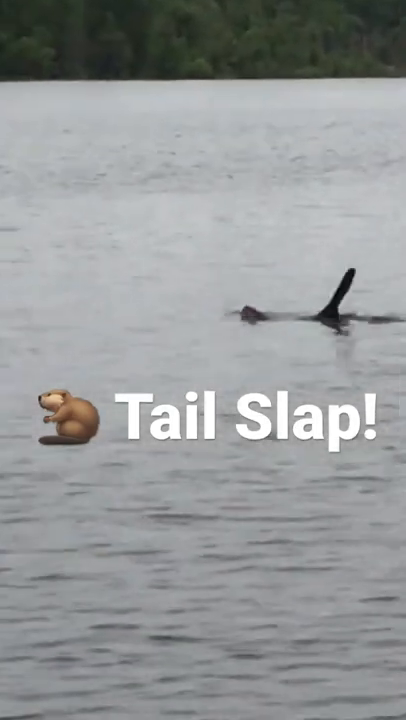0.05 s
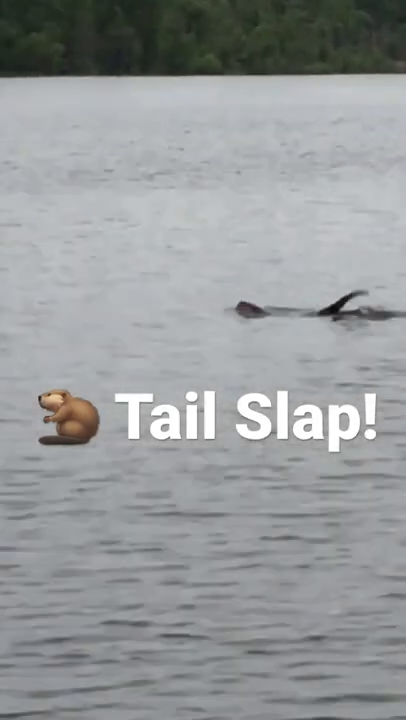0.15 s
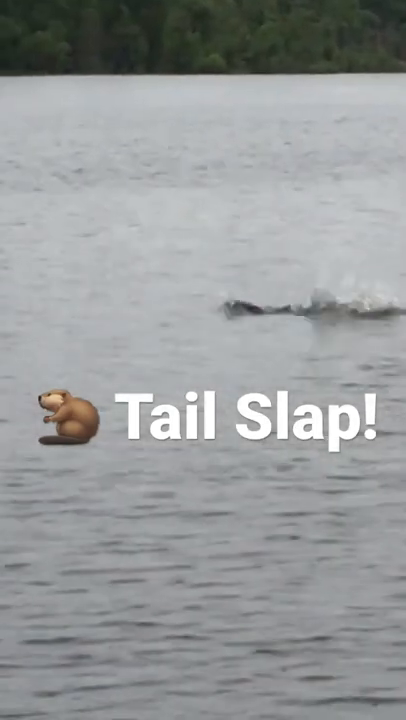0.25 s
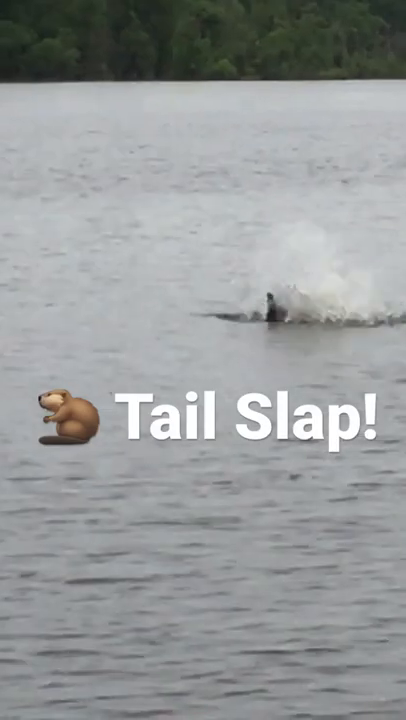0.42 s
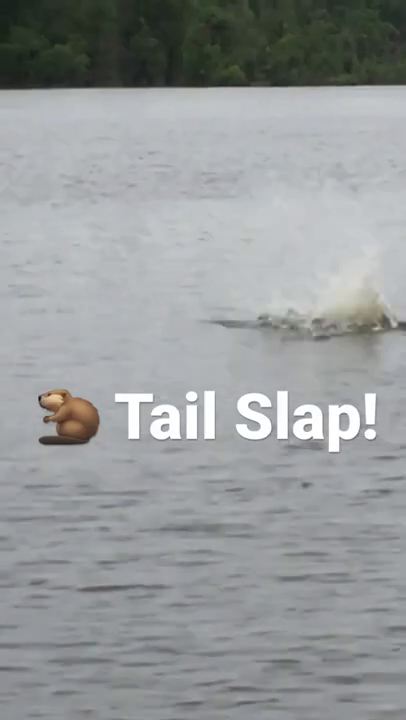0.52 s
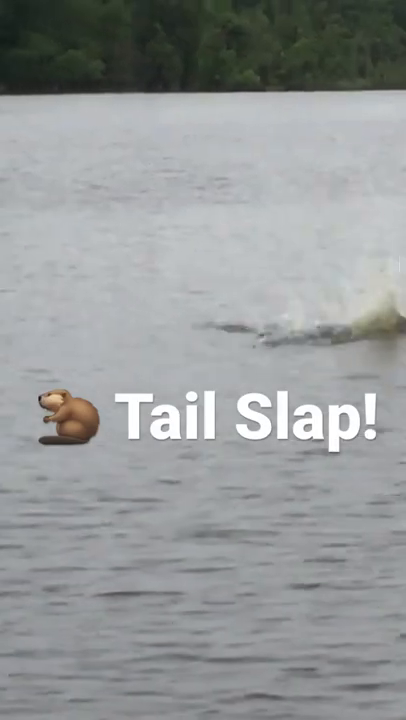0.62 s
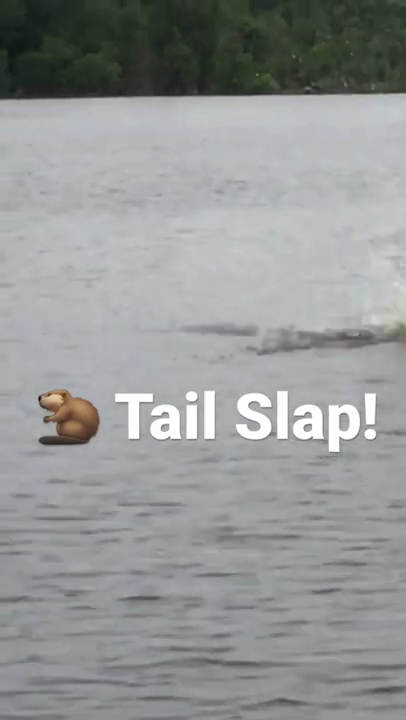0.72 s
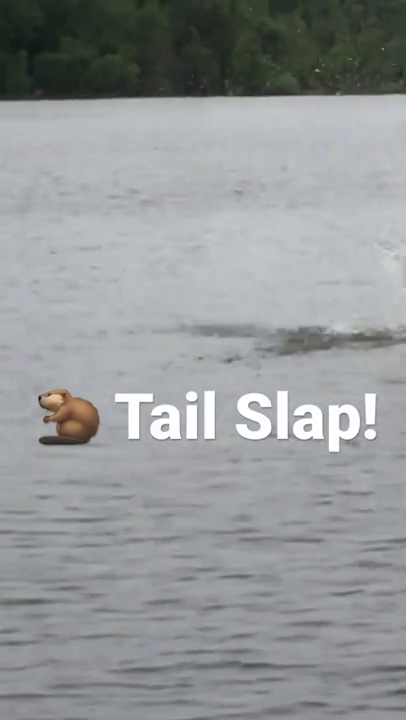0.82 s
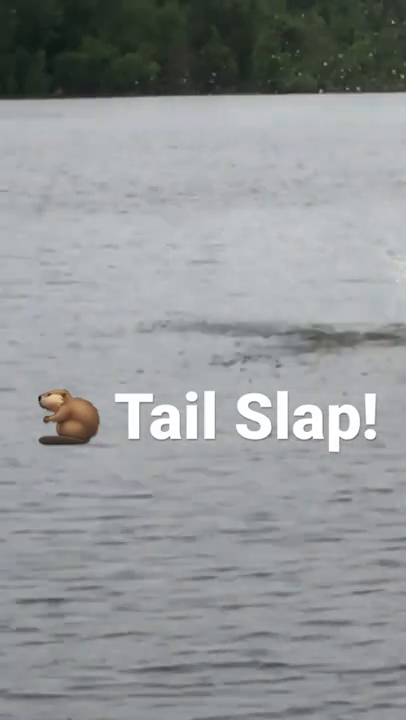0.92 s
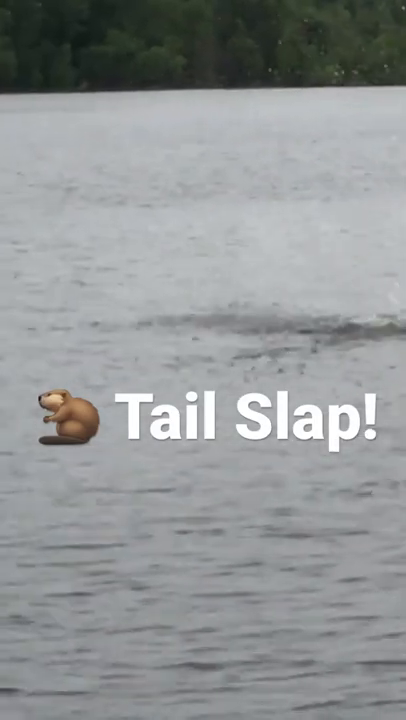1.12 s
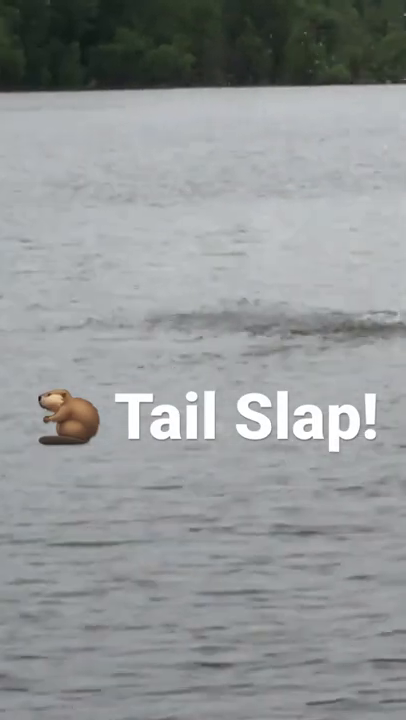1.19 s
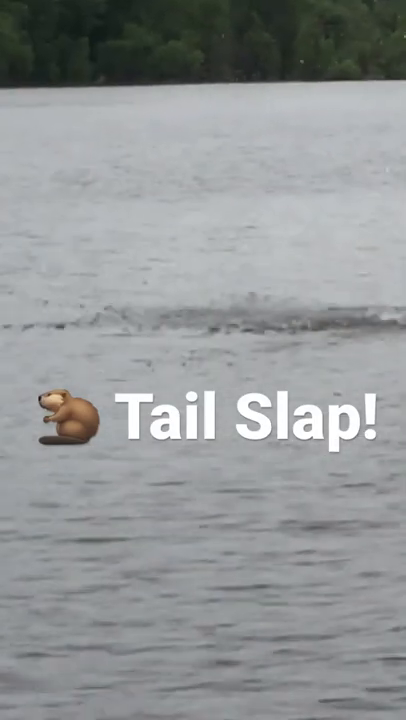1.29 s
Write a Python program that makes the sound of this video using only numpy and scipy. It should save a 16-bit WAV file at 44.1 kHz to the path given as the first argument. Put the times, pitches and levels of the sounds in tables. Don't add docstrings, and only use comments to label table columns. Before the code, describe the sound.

Sharp tail slap on open water, body plunging with a gulping plop, foam and falling droplets

```python
import sys
import numpy as np
from scipy import signal
from scipy.fft import rfft, irfft, next_fast_len
from scipy.io import wavfile
from scipy.ndimage import uniform_filter1d, map_coordinates

SR = 44100
rng = np.random.default_rng(int(sys.argv[2]) if len(sys.argv) > 2 else 0)


def nominal_scale(level):
    x = np.asarray(level, float) / 20
    return 10 ** x


def output_pcm(signal):
    pcm = np.clip(np.atleast_2d(signal).T, -1, 1) * 32767
    wavfile.write(sys.argv[1], SR, np.round(pcm).astype(np.int16))


N = 59535
T = np.arange(N) / SR


def unit(x):
    return x / np.sqrt(np.mean(x ** 2) + 1e-20)


def columns(rows, before=None, after=None):
    s, *cols = np.transpose(rows)
    return [np.interp(T, s, c, left=before, right=after) for c in cols]


def coloured(x, points):
    m = next_fast_len(N + 8192)
    hz, db = np.transpose(points)
    bins = np.fft.rfftfreq(m, 1 / SR)
    gain = nominal_scale(np.interp(np.log(bins + 1), np.log(hz + 1), db))
    return irfft(rfft(x, m) * gain, m)[:N]


def wobble(rate):
    return map_coordinates(rng.standard_normal(int(N * rate / SR) + 4), [T * rate])


def rush(points, patchy_db, spiky=0, size=(5, 8)):
    noise = rng.standard_normal(N) * np.exp(spiky * rng.standard_normal(N))
    z = signal.stft(noise, nperseg=256)[2]
    field = uniform_filter1d(rng.standard_normal(z.shape), size[0], 0)
    field = uniform_filter1d(field, size[1], 1)
    patchy = signal.istft(z * nominal_scale(patchy_db * unit(field)), nperseg=256)[1][:N]
    return unit(coloured(patchy, points))


def grains(count, hz, spread, cycles, scatter_db):
    u, g = rng.random((count, 2)), rng.standard_normal((count, 1))
    pitch, k = np.clip(hz * np.exp(spread * g), 200, 15000), np.arange(700)
    turns = pitch * k / SR
    level = nominal_scale(-scatter_db * np.log(u[:, :1] + .015))
    tone = np.sin(2 * np.pi * turns * (1 + .12 * turns / cycles))
    w = level * tone * np.exp(-3 * turns / cycles) * (turns < 3 * cycles)
    at = (u[:, 1:] * N).astype(int) + k
    return unit(np.bincount(at.ravel(), w.ravel(), N + 700)[:N])


def dying(s, t60, attack):
    t = np.maximum(T - s, 0)
    return nominal_scale(-60 * t / t60) * (1 - np.exp(-t / attack))


def ring(s, hz, db, t60, soft_s, rise):
    age = np.maximum(T - s, 0)
    tone = np.sin(2 * np.pi * hz * age * (1 + rise * age / t60))
    return nominal_scale(db) * dying(s, t60, soft_s) * tone


def bursts(rows):
    return sum(nominal_scale(db) * dying(s, t60, .0006) for s, db, t60 in rows)


def whistle(rows, unsteady_db, waver_hz):
    s = np.transpose(rows)[0]
    hz, db = columns(rows)
    edge = np.clip(np.minimum(T - s[0], s[-1] - T) / 0.0015, 0, 1)
    hz = uniform_filter1d(hz, size=180) + waver_hz * wobble(300)
    level = np.sqrt(2) * edge * nominal_scale(db + unsteady_db * wobble(130.1))
    return level * np.sin(2 * np.pi * np.cumsum(hz) / SR)


def wind():
    # (time [s], level [dB])
    gusts = [(0, -62.5), (.1, -63.5), (.13, -57.5), (.25, -54), (.33, -59), (.42, -53), (.62, -57.5),
             (.7, -54.5), (.88, -54.5), (.98, -56), (1.07, -63), (1.16, -51), (1.22, -59), (1.28, -56),
             (1.35, -59.5)]
    # (frequency [Hz], level [dB])
    rumble = [(20, -28), (50, -2), (150, -2), (260, -8), (600, -54)]
    db, = columns(gusts)
    lumps = nominal_scale(2.7 * wobble(17.44))
    return nominal_scale(db) * unit(lumps * rush(rumble, 0.34))


def lake_air():
    # (frequency [Hz], level [dB])
    hush = [(120, -67), (300, 7.5), (1000, 0), (3500, -4.5), (5000, -8.5), (11000, -9), (12500, -6),
            (16000, -7.5)]
    return nominal_scale(-65.5) * rush(hush, 1.6)


def insect():
    # (time [s], pitch [Hz], level [dB])
    shrill = [(.118, 7330, -88), (.13, 7330, -80), (.215, 7330, -80), (.3, 7330, -86)]
    return whistle(shrill, unsteady_db=1.8, waver_hz=5.8)


def bubbles():
    # (time [s], pitch [Hz], peak level [dB], t60 [s])
    single = [(0.477, 164, -18.5, 0.025), (0.4779, 316, -41.5, 0.075), (.158, 1820, -54.5, 0.051),
              (.346, 570, -49.5, 0.042), (.4178, 633, -27.5, 0.027), (0.416, 3900, -39.5, 0.019),
              (0.4404, 920, -31.5, 0.016), (0.4787, 1310, -37.5, 0.034), (.478, 3140, -39.5, 0.023),
              (.2354, 3110, -26.5, 0.01), (.2375, 1130, -32, 0.018), (0.2344, 2326, -31.5, 0.018),
              (0.46, 575, -38, 0.019), (.479, 3100, -45, 0.012)]
    return -sum(ring(s, hz, db, t60, soft_s=0.00062, rise=0.11) for s, hz, db, t60 in single)


def crack(slap_s, hold_s):
    # (frequency [Hz], level [dB])
    colour = [(150, -50), (500, -18), (1400, -9), (2350, -1), (3300, -8), (5600, -7), (7100, -4),
              (10300, -12), (16500, -16)]
    slap_db, t60 = -23.5, 0.015
    lead_s, lead_db = 0.0048, -9
    times = [slap_s - lead_s - .002, slap_s - lead_s, slap_s - .0003, slap_s, slap_s + 0.0027]
    db = np.interp(T, times, [-60, lead_db - 18.5, lead_db, -4, 0], left=-200)
    db = db - 60 * np.maximum(T - slap_s - hold_s, 0) / t60
    return nominal_scale(slap_db + db) * rush(colour, 1.5, spiky=.45)


def air_pops():
    # (time [s], peak level [dB], width [s], recoil [0-1])
    pockets = [
        (.2390, -18, .00021, .36),
        (.2408, -16.5, .00022, .2),
        (.2429, -31, .00025, .4),
    ]
    recoil_widths, recoil_late = 2.2, 4
    pops = 0
    for s, db, width, recoil in pockets:
        spike = np.exp(-np.abs(T - s) / width)
        back = np.exp(-.5 * ((T - s - recoil_late * width) / (recoil_widths * width)) ** 2)
        pops = pops + nominal_scale(db) * (spike - recoil * back)
    return coloured(pops, [(80, -24), (260, 0), (400, -3.5), (560, .5)])


def slap():
    # (frequency [Hz], level [dB per Hz])
    sheet_colour = [(100, -45), (250, -3), (600, -3), (2500, -14), (8000, -20.5), (16000, -31)]
    slap_s, hold_s = .2333, 0.0027
    sheet = nominal_scale(-39) * dying(slap_s + hold_s, 0.12, .003) * rush(sheet_colour, 1.2, .3)
    return crack(slap_s, hold_s) + air_pops() + sheet


def wash():
    # (time [s], level [dB])
    churn = [(.29, -60.5), (.33, -69), (.375, -56.5), (.41, -51.5), (.45, -47.5), (.5, -48.5), (.6, -53.5),
             (.72, -53), (.86, -56.5), (1.1, -57.5), (1.35, -64.5)]
    # (time [s], level [dB])
    spray = [(.29, -71), (.35, -61.5), (.41, -58.5), (.44, -56.5), (.5, -51.5), (.6, -54.5), (.75, -55),
             (.9, -55.5), (1.05, -53.5), (1.2, -52), (1.35, -52.5)]
    # (frequency [Hz], level [dB per Hz])
    foam_colour = [(120, -59), (250, -1), (650, 1), (1400, -2.5), (3500, -12), (6000, -32), (12000, -46)]
    # (frequency [Hz], level [dB per Hz])
    rain_colour = [(300, -70), (900, -5), (2000, -5), (4300, -4), (7000, -5.5), (12000, -11.5),
                   (16000, -9.5)]
    churn_db, = columns(churn, before=-120)
    spray_db, = columns(spray, before=-120)
    shared_db = .6 * wobble(25)
    fizz = 0.74 * grains(count=1400, hz=826, spread=0.576, cycles=4, scatter_db=1.5)
    foam = unit(rush(foam_colour, 2.46) + fizz)
    patter = .28 * grains(count=800, hz=4500, spread=.6, cycles=3, scatter_db=3.5)
    plinks = .25 * grains(count=2500, hz=3200, spread=.55, cycles=4, scatter_db=2.8)
    rain = unit(rush(rain_colour, 2.4, .2, size=(18, 1)) + patter + plinks)
    foam = nominal_scale(churn_db + shared_db + .9 * wobble(60)) * foam
    return foam + nominal_scale(spray_db + shared_db + 1.2 * wobble(150)) * rain


def slops():
    # (time [s], rms level [dB], t60 [s])
    falls = [
        (.4165, -38, .045),
        (.427, -42, .035),
        (.477, -40, .05),
        (.556, -52, .04),
        (.983, -49, .025),
        (1.009, -48, .02),
    ]
    # (frequency [Hz], level [dB per Hz])
    dull = [(120, -41), (300, -14), (700, -2), (1500, -11.5), (4000, -12.5), (9000, -19.5), (16000, -26.5)]
    return bursts(falls) * rush(dull, .8, .5)


def cavity():
    start_s, start_hz, db, t60, attack_s = .483, 60.6, -26.8, 0.33, 0.0008
    close_s, climb_hz, narrow_s, fade_s = .582, 60, 0.0175, 0.006
    climb = climb_hz * np.exp(np.minimum(T - close_s, .01) / narrow_s)
    hz = (start_hz + climb) * (T > start_s)
    shut = 1 / (1 + np.exp(np.clip((T - close_s) / fade_s, -50, 50)))
    squeeze = np.maximum(hz / start_hz, 1) ** 1.6
    tone = np.sin(2 * np.pi * np.cumsum(hz) / SR)
    return -nominal_scale(db) * dying(start_s, t60, attack_s) * shut * squeeze * tone


def drips():
    # (time [s], pitch [Hz], peak level [dB])
    plinks = [(0.5068, 3280, -41), (0.5236, 6590, -55), (0.5245, 5990, -55), (0.544, 6370, -56),
              (0.5558, 9300, -47), (0.5572, 6240, -57), (0.6043, 5940, -48), (0.6125, 6760, -56),
              (0.6139, 6070, -56), (0.6252, 625, -46), (0.6302, 3620, -50), (0.6515, 8750, -53),
              (0.656, 5990, -56), (0.6674, 7110, -60), (0.6715, 3720, -44.5), (0.6742, 8790, -53),
              (0.7395, 3330, -50), (0.7409, 9130, -59), (0.8075, 9170, -62), (0.837, 4820, -55),
              (0.9159, 956, -47), (0.9204, 9470, -60), (0.9363, 3370, -48), (0.9814, 1800, -45),
              (0.983, 6980, -55), (0.9835, 900, -49), (1.0057, 3500, -48), (1.0098, 2280, -50),
              (1.014, 950, -47), (1.0261, 9000, -54), (1.0461, 1800, -47.5), (1.0733, 2810, -53),
              (1.0787, 2230, -50), (1.081, 4520, -52), (1.1195, 8910, -54), (1.1545, 5770, -53),
              (1.1545, 6760, -48), (1.1593, 1000, -50.5), (1.1731, 9260, -58), (1.1771, 3120, -47),
              (1.2016, 5800, -47), (1.237, 8740, -56), (1.2447, 3100, -48), (1.2461, 3940, -48),
              (1.2597, 3850, -45), (1.2901, 4330, -52), (1.2969, 6100, -46), (1.301, 4520, -56),
              (1.3087, 2760, -41), (1.3132, 8900, -50), (1.3395, 8600, -46), (1.3404, 3360, -56)]
    total = 0
    for s, hz, db in plinks:
        t60 = .03 * (1000 / hz) ** .5
        total = total + ring(s, hz, db + 3, t60, soft_s=.0007, rise=.22)
    return total


def bird():
    # (time [s], pitch [Hz], level [dB])
    calls = [
        [(.69, 4400, -72), (.706, 5400, -64), (.722, 6400, -67), (.745, 6900, -76), (.764, 7550, -66),
         (.777, 6800, -65), (.784, 6200, -55), (.802, 5880, -57), (.81, 5950, -67), (.85, 5950, -70)],
        [(.866, 4000, -70), (.877, 4700, -58), (.881, 5200, -67), (.887, 6000, -63), (.897, 6700, -66),
         (.91, 6900, -80), (.927, 7150, -64), (.938, 7400, -62), (.949, 6900, -65), (.955, 6300, -54),
         (.965, 6030, -56), (.983, 6050, -63), (1.02, 6000, -69)],
        [(1.03, 4300, -72), (1.042, 4600, -54), (1.048, 5000, -59), (1.056, 6100, -60), (1.068, 6760, -61),
         (1.09, 6850, -67), (1.108, 7500, -60), (1.118, 7100, -63), (1.13, 6100, -55), (1.147, 5350, -55),
         (1.153, 5250, -75)],
        [(1.186, 4250, -70), (1.194, 4200, -56), (1.205, 4250, -62), (1.21, 4500, -70), (1.216, 4750, -56),
         (1.224, 5000, -68), (1.232, 5400, -55), (1.239, 6100, -62), (1.252, 6700, -63)],
    ]
    return sum(whistle(call, unsteady_db=1.8, waver_hz=45) for call in calls)


def ticks():
    # (time [s], pitch [Hz], peak level [dB])
    strikes = [
        (.9835, 1500, -42),
        (1.0105, 1600, -41),
        (1.155, 6000, -46),
        (1.1878, 4200, -36),
        (1.2213, 4800, -41),
        (1.2385, 6500, -46),
        (1.3025, 4700, -41),
        (1.3105, 2900, -39),
        (1.343, 3500, -43),
    ]
    total = 0
    for s, hz, db in strikes:
        t60 = 14 / hz
        total = total + nominal_scale(db) * dying(s, t60, .0001) * np.sin(2 * np.pi * hz * (T - s))
    return -total


def drops():
    # (time [s], rms level [dB], t60 [s])
    landings = [
        (1.155, -49, .015),
        (1.188, -43, .01),
        (1.2215, -46, .01),
        (1.268, -51, .012),
        (1.303, -46, .01),
        (1.311, -47, .025),
        (1.341, -49, .025),
    ]
    # (frequency [Hz], level [dB])
    bright = [(1200, -30), (3000, -2), (4500, 0), (7000, -6), (16000, -16)]
    return bursts(landings) * rush(bright, .6, .3, size=(18, 2))


def scene():
    around = wind() + lake_air() + insect() + bird()
    splash = slap() + wash() + slops() + cavity()
    return (around + splash + bubbles() + drips() + ticks() + drops())[None]


def roll_off(x):
    return signal.sosfilt(signal.butter(12, 16990, fs=SR, output="sos"), x)


def record(dry):
    # (frequency [Hz], level [dB])
    shut_db = [(300, -2.5), (2000, -8), (6000, -8.5), (14000, -11.5)]
    # (frequency [Hz], level [dB])
    mic = [(34, -21), (49, -0.5), (4500, 1.5), (5000, -2.5), (5800, 0.5), (7850, -3), (8900, 2),
           (10300, -0.5), (11500, 3.5)]
    open_s, open_takes_s, top_hz, loud_db = 0.11, 0.012, 15750, -38
    opened = np.clip((T - open_s) / open_takes_s, 0, 1)
    muffled = coloured(dry[0], [(30, 0.0074), (150, 0.025)] + shut_db)
    x = coloured(opened * dry[0] + (1 - opened) * muffled, mic)
    over = uniform_filter1d(np.abs(x), size=200) > nominal_scale(loud_db)
    loud = uniform_filter1d(1. * over, size=200)
    body = coloured(x, [(top_hz - 250, 0), (top_hz, -6), (top_hz + 250, -90)])
    top = coloured(x, [(top_hz + 350, -120), (top_hz + 700, -18), (top_hz + 1100, -40), (top_hz + 1300, -120)])
    return roll_off((body + loud * top * (T < .3))[None])


dry = scene()
out = record(dry)
output_pcm(out)
```